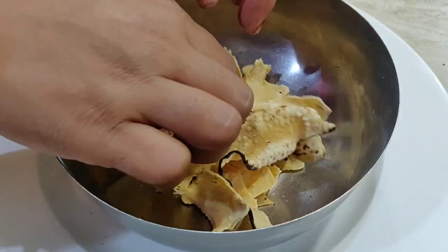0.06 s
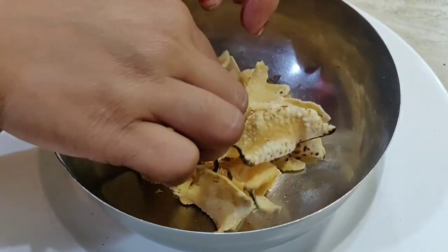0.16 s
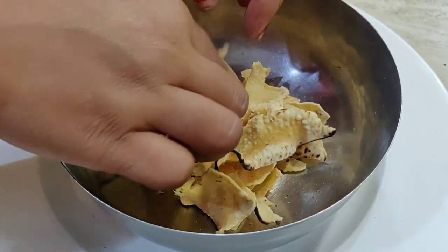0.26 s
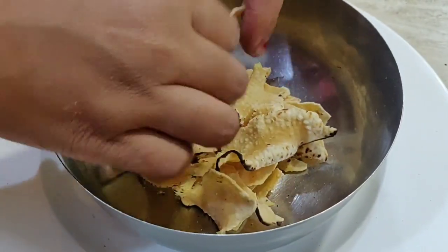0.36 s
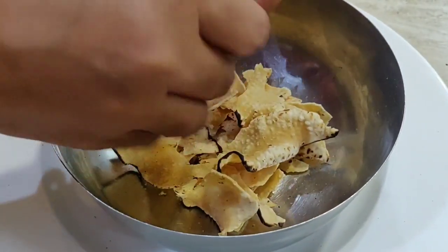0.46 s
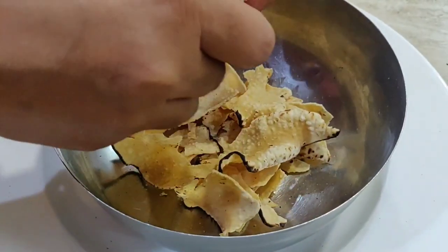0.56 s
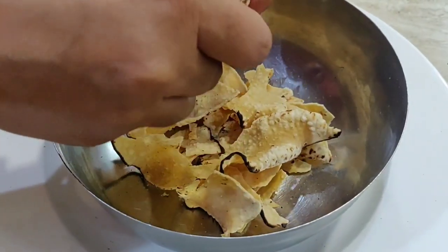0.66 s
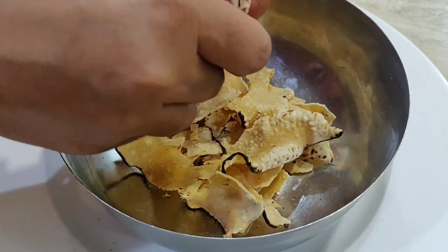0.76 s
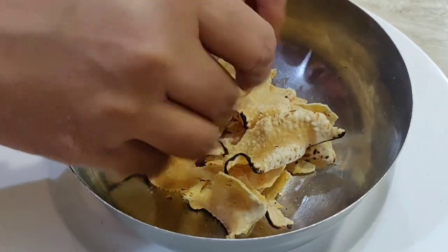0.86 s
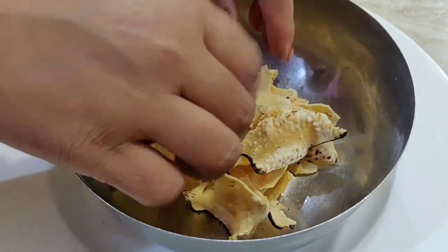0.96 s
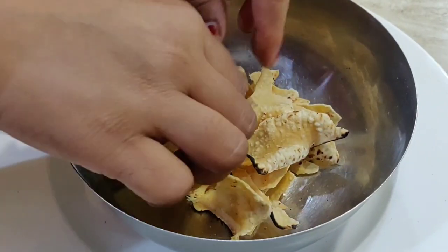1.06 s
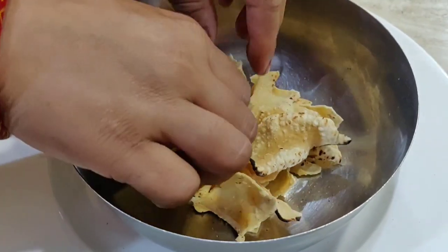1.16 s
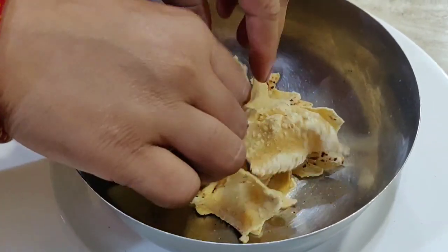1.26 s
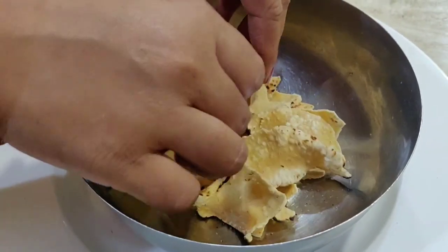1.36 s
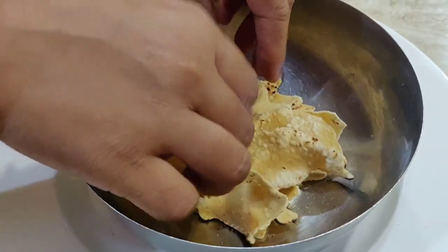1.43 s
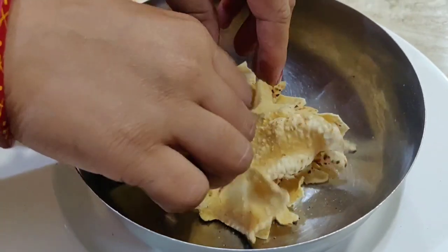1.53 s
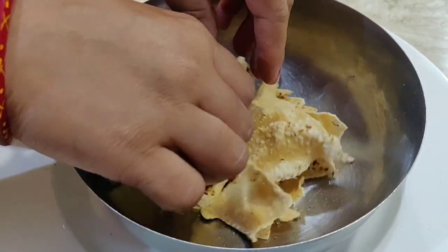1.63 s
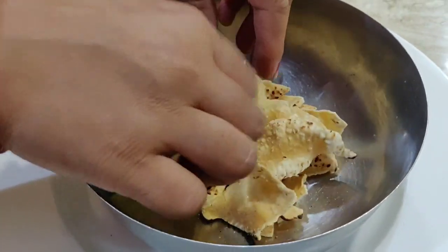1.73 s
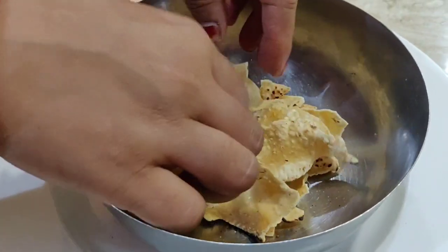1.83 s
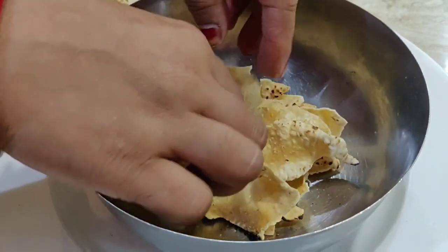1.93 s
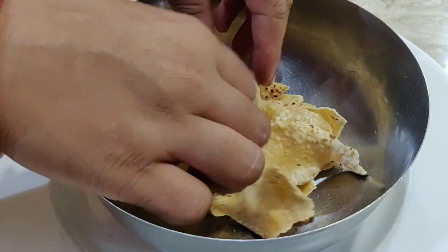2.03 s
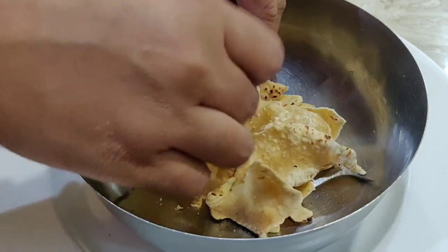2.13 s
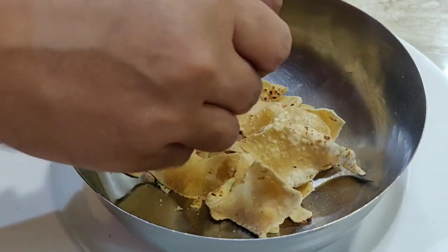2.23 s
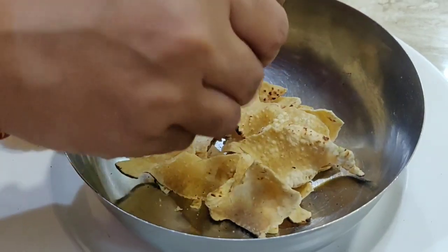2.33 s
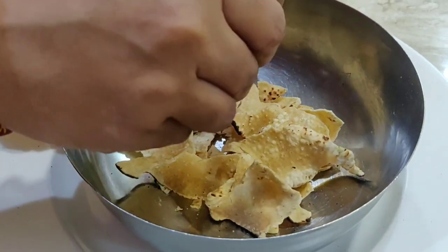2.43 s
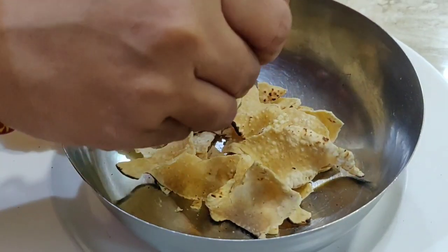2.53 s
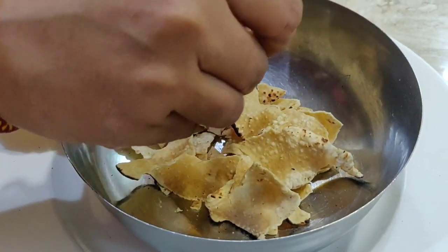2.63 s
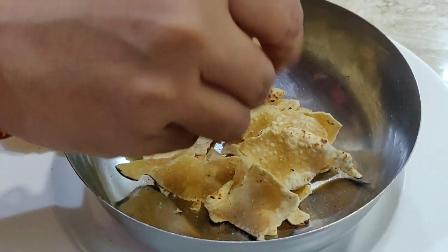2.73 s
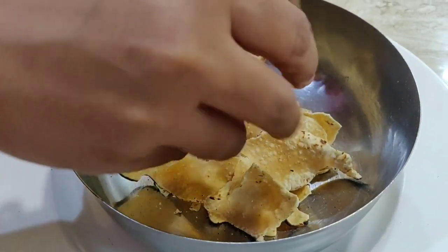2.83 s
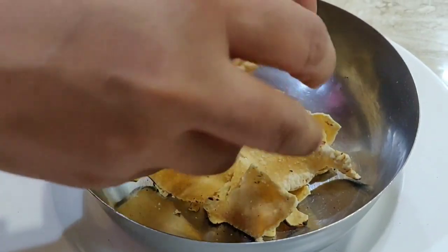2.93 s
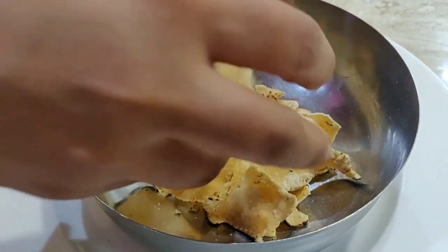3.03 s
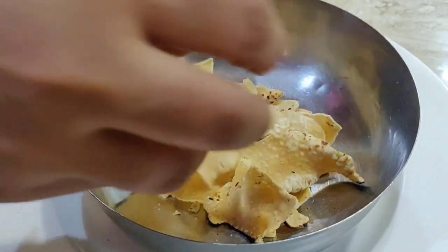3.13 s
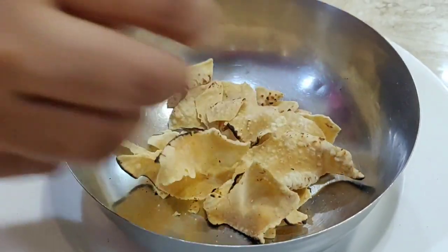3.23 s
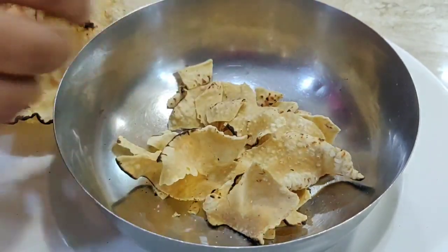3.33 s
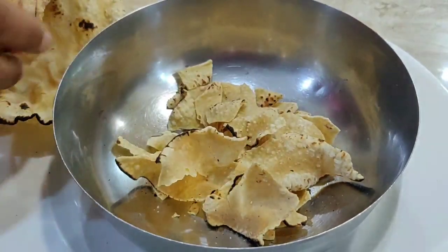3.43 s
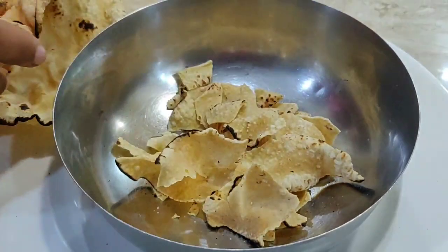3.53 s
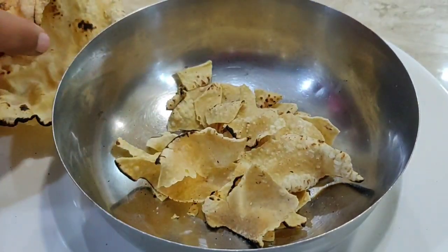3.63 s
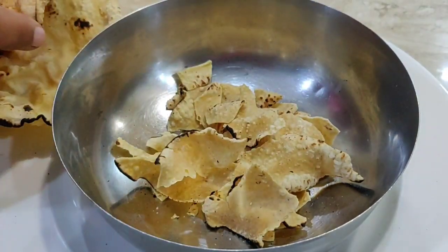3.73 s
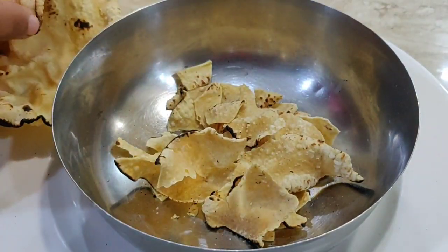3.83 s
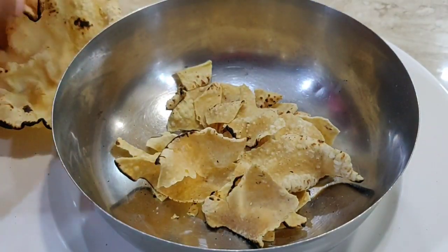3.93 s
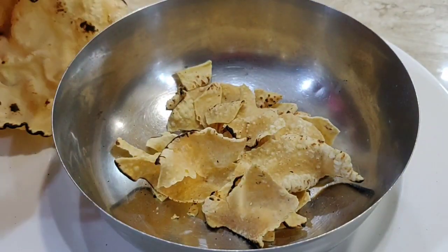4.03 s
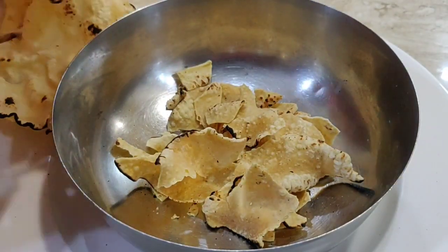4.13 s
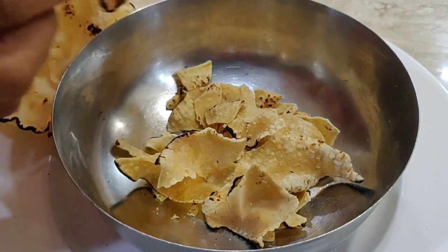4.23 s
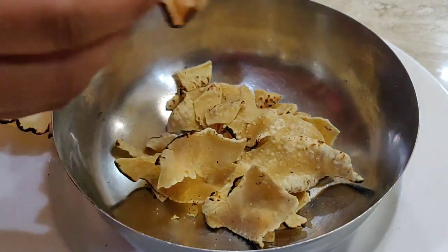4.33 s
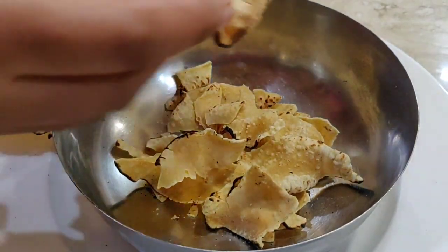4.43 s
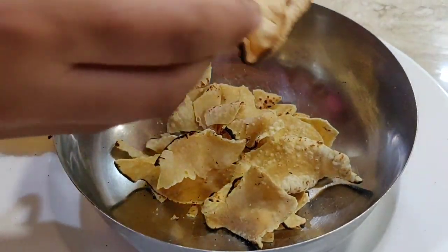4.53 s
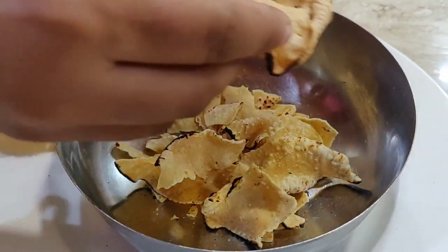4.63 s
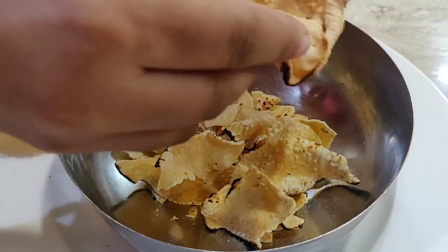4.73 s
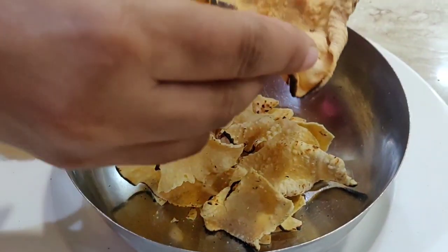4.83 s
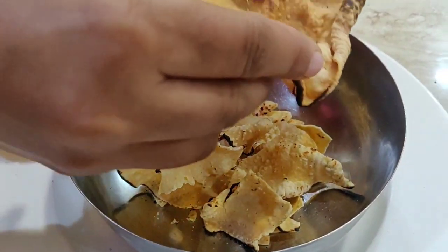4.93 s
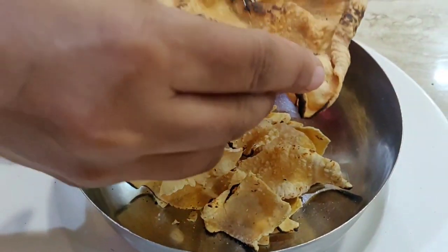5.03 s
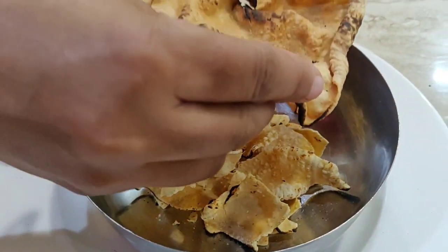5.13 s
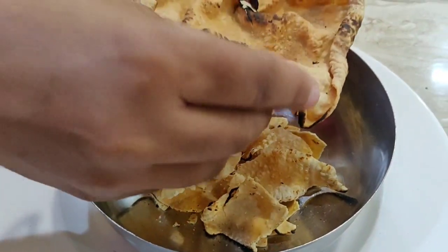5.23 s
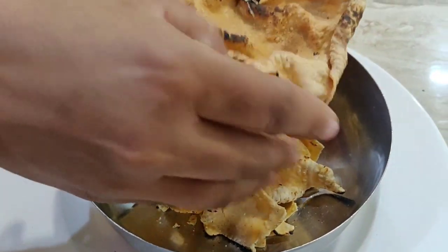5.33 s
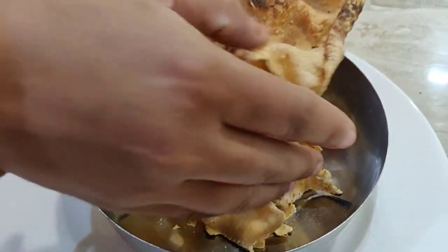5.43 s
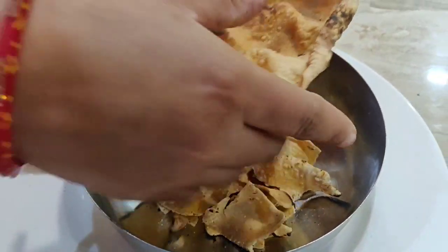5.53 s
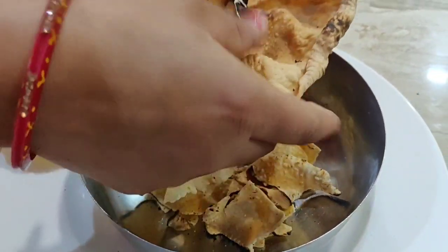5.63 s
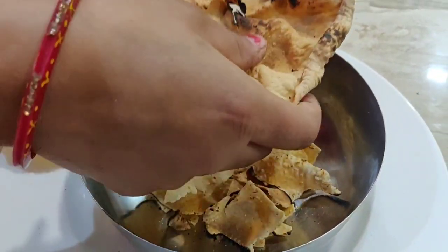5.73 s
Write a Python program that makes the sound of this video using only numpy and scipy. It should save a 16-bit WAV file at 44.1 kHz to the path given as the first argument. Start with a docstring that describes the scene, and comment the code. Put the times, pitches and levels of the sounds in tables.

```python
"""Over a low appliance rumble and hum, fingers break brittle roasted wafers into a steel bowl in a kitchen.
From the start, grips crush and rub shards: grains crackle over a sliding hiss. Between and over them come
snaps, each a short bright noise burst through shard resonances with a duller knock, answered by the walls.
Faint sine tones sound outside from about two seconds and again past five; near four seconds a whole wafer
is picked up and knocks hollowly, and the breaking then returns. A close two-port microphone hears it all."""
import sys
import numpy as np
from scipy import signal
from scipy.fft import rfft, irfft, next_fast_len
from scipy.io import wavfile
from scipy.ndimage import uniform_filter1d, map_coordinates

SR = 44100
rng = np.random.default_rng(int(sys.argv[2]) if len(sys.argv) > 2 else 0)


def generate_wav(signal):
    """Clip the signal to [-1, 1] and save it as 16-bit WAV at the path in sys.argv[1]."""
    frames = np.transpose(np.atleast_2d(signal))
    scaled = np.clip(frames, -1, 1) * 32767
    pcm = np.round(scaled).astype(np.int16)
    wavfile.write(sys.argv[1], SR, pcm)


N = 254376

# colour of splintering and sliding shards: pitch_hz, gain_db
SPLINTER = [(1500, -36.5), (2600, -17.5), (4000, -3.5), (5500, -6), (7000, -7), (9000, 2.5), (12000, 10),
            (16000, -8)]
# bending modes of small pieces: pitch_hz, width_hz, gain_db (before the layer's level)
WAFER_MODES = [(537, 690, -7), (994, 132, 6.5), (1362, 83, 5), (1648, 230, 2), (2680, 810, 5.5),
               (3400, 6300, -1)]
# a whole wafer flexes at other pitches: pitch_hz, width_hz, gain_db (before the layer's level)
WHOLE_MODES = [(430, 390, -1.5), (1445, 220, -2), (2070, 880, -8)]
# grips that crush and rub shards: start_s, hold_s, fizz_db, small_pieces_db, whole_wafer_db, left_right_tilt_db
GRIPS = [(0.0, 0.23, -42, -57.5, -63, 0.5), (0.308, 0.11, -54.5, -80, -70, 3),
         (0.565, 0.23, -50.5, -66.5, -70, -2), (0.964, 0.11, -49, -68, -76, 8),
         (1.094, 0.11, -37.5, -51.5, -80, -1.5), (1.225, 0.075, -37.5, -48.5, -71, 0.5),
         (1.449, 0.13, -34.5, -48, -72, 2.5), (1.607, 0.125, -36, -60, -77, 3),
         (1.782, 0.06, -42, -55, -74, 7), (1.85, 0.15, -38, -55, -74, -1.5),
         (2.036, 0.1, -45.5, -65, -61, 6), (2.579, 0.38, -54.5, -69, -69, 0),
         (2.847, 0.13, -55, -63.5, -79, -4), (3.104, 0.064, -44.5, -63, -57, 2),
         (3.602, 0.04, -60, -75, -61, 6), (3.702, 0.056, -49.5, -65, -57, 3),
         (3.771, 0.1, -49.5, -55.5, -54, 2.5), (3.913, 0.05, -55, -58.5, -52.5, 9),
         (4.03, 0.17, -56, -50.5, -51.5, 9), (4.202, 0.18, -41.5, -55.5, -61, 1.5),
         (4.412, 0.15, -52, -70, -61.5, 3.5), (4.625, 0.22, -53.5, -58, -61.5, -2),
         (4.93, 0.11, -35.5, -54.5, -77, -2), (5.074, 0.24, -39.5, -51.5, -78, 1.5),
         (5.428, 0.034, -45, -63.5, -60.5, -2), (5.602, 0.052, -52.5, -64, -60.5, -4)]


def amp(db):
    """Decibels to a gain factor."""
    return 10 ** (np.asarray(db) / 20)


def unit(x):
    """Scale to an RMS of one along the last axis."""
    return x / np.sqrt(np.mean(x ** 2, axis=-1, keepdims=True) + 1e-20)


def along(points, hz):
    """Interpolate (Hz, value) points on a log frequency axis."""
    f, v = np.transpose(points)
    return np.interp(np.log(hz + 1), np.log(f + 1), v)


def filtered(x, response):
    """Multiply the spectrum of x by a response of frequency, which may be complex."""
    m = next_fast_len(x.shape[-1] * 9 // 8 + 1024)
    spectrum = rfft(x, m) * response(np.fft.rfftfreq(m, 1 / SR))
    return irfft(spectrum, m)[..., :x.shape[-1]]


def causal(points):
    """The minimum-phase response with the gain of (Hz, dB) points."""
    def response(hz):
        cepstrum = irfft(np.log(amp(along(points, hz))))
        half = len(cepstrum) // 2
        cepstrum[1:half] *= 2  # fold onto positive time
        cepstrum[half + 1:] = 0
        return np.exp(rfft(cepstrum))
    return response


def peak(f, hz, width_hz):
    """One damped resonance, with unit gain at its centre."""
    return 1j * f * width_hz / (hz * hz - f * f + 1j * f * width_hz + 1e-9)


def resonances(modes):
    """The bending resonances of a hand-held piece, summed with alternating sign."""
    return lambda f: sum((-1) ** k * amp(db) * peak(f, hz, width)
                         for k, (hz, width, db) in enumerate(modes))


def wobble(rate):
    """A smooth random curve with a given number of knots a second."""
    knots = rng.standard_normal(int(N * rate / SR) + 4)
    return map_coordinates(knots, [np.arange(N) * rate / SR])


def patchy(x, depth_db):
    """Random patches of gain in time and frequency: the touching edges keep changing."""
    z = signal.stft(x, nperseg=256)[2]
    field = uniform_filter1d(rng.standard_normal(z.shape[-2:]), size=5, axis=0)
    field = uniform_filter1d(field, size=9, axis=1)
    return signal.istft(z * amp(depth_db * field / field.std()), nperseg=256)[1][..., :N]


def placed(s, rows):
    """Sum rows of short sounds at their start times in seconds."""
    at = np.round(s * SR).astype(int)[:, None] + np.arange(rows.shape[1])
    return np.bincount(at.ravel(), rows.ravel(), N + SR)[:N]


def rumble():
    """Steady room noise: the ports agree in the bass, oppose near 1650 Hz and partly agree at the top."""
    # colour of the room noise: pitch_hz, density_db (relative, per Hz)
    rumble_colour = [(15, -11), (25, 0.5), (151, -9.5), (193, -14.5), (340, -16), (446, -26), (504, -21.5),
                     (614, -32), (678, -24), (786, -27.5), (2760, -34.5), (3050, -31), (3440, -36.5),
                     (9000, -34.5), (11700, -40), (19800, -120)]
    # left-right correlation: pitch_hz, likeness (-1 to 1)
    likeness = [(60, 0.88), (180, 0.87), (550, 0.49), (1650, -0.95), (4970, 0.083), (15000, 0.47)]

    def mid_side(hz):
        turn = np.arccos(np.clip(along(likeness, hz), -1, 1)) / 2
        return amp(along(rumble_colour, hz)) * [np.cos(turn), np.sin(turn)]

    mid, side = filtered(rng.standard_normal((2, N)), mid_side)
    return amp(-50) * unit(np.array([mid + side, mid - side]))


def hum():
    """Narrow bands of low noise, the same at both ports, whose strengths drift and now and then swell."""
    # hum bands: pitch_hz, width_hz (of each of two filter passes), level_db (before swells and drift)
    hum_bands = [(44.7, 11, -58), (85, 18.5, -58.5), (165.4, 28, -61.5)]
    # swells, one list per band: centre_s, length_s, rise_db
    hum_swells = [
        [(1.25, 0.2, 6.5), (4.8, 0.18, 6)],
        [(0.4, 0.35, 3.5), (3.15, 0.2, 9.5)],
        [(2.0, 0.29, 6), (3.4, 0.2, 3.5)],
    ]
    t = np.arange(N) / SR
    total = 0
    for (hz, width, db), swells in zip(hum_bands, hum_swells):
        band = unit(filtered(rng.standard_normal(N), lambda f: peak(f, hz, width) ** 2))
        swell_db = sum(rise_db * np.exp(-((t - s) / length) ** 2) for s, length, rise_db in swells)
        drift_db = 1 * wobble(2.515)
        total = total + band * amp(db + swell_db + drift_db)
    return total


def grains(count, low_hz, high_hz, cycles, spread_db, clump_db):
    """Tiny shards, each ringing a few cycles at its own pitch; neighbours in time are alike in size."""
    at, pitch, size, left, right = rng.random((count, 5)).T
    s = at * N / SR
    clump = map_coordinates(rng.standard_normal(N * 70 // SR + 4), [s * 70])  # 70 knots a second
    turns = (low_hz * (high_hz / low_hz) ** pitch)[:, None] * np.arange(200) / SR
    size_db = -spread_db * np.log(size + .003) + clump_db * clump
    decay = amp(size_db)[:, None] * np.exp(-turns / cycles)
    ports = [placed(s, decay * np.sin(2 * np.pi * (turns + phase[:, None]))) for phase in (left, right)]
    return unit(np.array(ports))


def pressure(db):
    """The gain of a layer under all grips: each sets in fast, holds and lets go; powers add."""
    attack_s, let_go_db_per_s = 0.006, 150
    start, hold = np.transpose(GRIPS)[:2, :, None]
    t = np.arange(0, N + 64, 64) / SR - start  # one step every 64 samples
    attack = np.clip(1 + t / attack_s, 0, 1)  # full by the start time
    shape = attack * amp(-let_go_db_per_s * np.clip(t - hold, 0, None))
    return np.repeat(np.linalg.norm(amp(db)[:, None] * shape, axis=0), 64)[:N]


def rubbing():
    """Crackle of tiny breaks over the hiss of shards sliding; small and whole pieces sound along."""
    uneven_db, rest_db = 3.5, -64.5  # grip unevenness; small pieces keep settling at a constant level
    fizz_db, small_db, whole_db, tilt_db = np.transpose(GRIPS)[2:]

    def level(db):
        return pressure(db) * amp(uneven_db * wobble(18))

    hiss = unit(filtered(rng.standard_normal((2, N)), causal(SPLINTER)))
    crackle = grains(count=12000, low_hz=4600, high_hz=10400, cycles=1.05, spread_db=-0.5, clump_db=1.5)
    fizz = unit(patchy(crackle + 2.62 * hiss, depth_db=3.0))
    body = grains(count=4000, low_hz=408, high_hz=2850, cycles=1.9, spread_db=3.0, clump_db=4.5)
    body = body + 3.3 * rng.standard_normal((2, N))
    body = patchy(body + 0.15 * body[::-1], depth_db=3.0)  # long waves partly reach both ports alike
    small = unit(filtered(body, resonances(WAFER_MODES)))
    # a whole wafer rustles softly, without grains
    slide = rng.standard_normal((2, N)) + 2.1 * rng.standard_normal(N)
    whole = unit(filtered(patchy(slide, depth_db=0.0), resonances(WHOLE_MODES)))
    fizz_levels = [level(fizz_db - 0.5 + tilt_db / 2), level(fizz_db + 2.0 - tilt_db / 2)]
    return fizz * fizz_levels + small * (level(small_db) + amp(rest_db)) + whole * level(whole_db)


def crumbs():
    """Small chance breaks while a grip holds, stronger under a stronger grip."""
    count, over_fizz_db, spread_db = 130, 6.5, 4
    knock_db, t60_s, pan_db = -19, 0.021, 7  # knock re the break; middle decay; widest pan around the grip
    at, size, pitch, length, side = rng.random((count, 5)).T
    start, hold, fizz_db, _, _, tilt_db = np.transpose(GRIPS)
    held = np.cumsum(hold)
    k = np.searchsorted(held, at * held[-1])  # longer grips get more crumbs
    s = start[k] + held[k] - at * held[-1]
    db = fizz_db[k] + over_fizz_db - spread_db * np.log(size + 0.019)
    return np.transpose([s, db, np.full(count, knock_db), 5000 * 1.6 ** pitch,
                         t60_s * (.5 + length), tilt_db[k] + pan_db * (2 * side - 1)])


def bursts(rise, t60, size):
    """Rows of spiky noise that build up, then die away."""
    t = np.arange(size) / SR - rise[:, None]
    z = rng.standard_normal((len(t60), 2, size))
    lumps = amp(3.34 * unit(uniform_filter1d(z[:, 1], 24)))  # a crack runs in jerks
    envelope = np.where(t < 0, 1 + t / rise[:, None], amp(-60 * np.abs(t) / t60[:, None]))
    return z[:, 0] * lumps * envelope


def sized(rows, db, seconds):
    """Rows given the energy of a level held for some seconds."""
    gain = amp(db) * np.sqrt(seconds * SR)
    return rows / np.linalg.norm(rows, axis=1, keepdims=True) * gain[:, None]


def breaks(rows, knock_hz, body, body_db):
    """The splintering reaches each port by its own path; the short, duller knock is partly common to both."""
    s, db, knock_db, shard_hz, t60, pan_db = np.transpose(rows)
    t60 = np.clip(t60, .004, .08)
    rise = np.clip(0.0008 + 0.02 * t60, .0002, .02)  # seconds; longer breaks also build up longer
    extra_hz = 3800 * 2.68 ** rng.random((len(s), 3))  # every shard has a few more modes of its own
    # every knock weights the bending modes anew
    weights_db = 5 * rng.standard_normal((len(s), len(body), 1))
    bending = resonances([(hz, width, level + body_db + weights_db[:, k])
                          for k, (hz, width, level) in enumerate(body)])

    def bright(f):
        extra = sum(peak(f, hz[:, None], 370) for hz in extra_hz.T)
        modes = peak(f, shard_hz[:, None], 1600) + 0.12 * extra
        return causal(SPLINTER)(f) * (0.43 + modes)

    def dull(f):
        return bending(f) - peak(f, knock_hz[:, None], 330)

    short = np.minimum(0.97 * t60, .015)  # knock decay in seconds

    def push():
        return bursts(0.67 * rise, short, size=2000)

    common = push()

    def crack(side):
        splinters = filtered(bursts(rise, t60, size=2000), bright)
        return sized(splinters, db + side * pan_db / 2, 0.023 * (t60 + 4 * rise))

    def knock():
        thud = filtered(common + 0.66 * push(), dull)
        return sized(thud, db + knock_db, 0.026 * (short + 0.78 * rise + 0.0014))

    direct = [placed(s, crack(side) + knock()) for side in (1, -1)]
    # the walls hear each break from all sides: one plain click scaled by level and length
    clicks = placed(s + rise, (amp(db) * np.sqrt((t60 + 4 * rise) * SR / 60))[:, None])
    return np.array(direct), clicks


def kitchen(x, count=4):
    """Hard walls answer; moving hands keep changing the paths, so several noise tails take turns."""
    # decay of the room: pitch_hz, t60_s
    room_decay = [(500, 0.19), (3000, 0.45), (5000, 0.54), (8000, 0.81), (15000, 0.22)]
    hz, t, z = signal.stft(rng.standard_normal((count, 2, SR * 3 // 4)), SR, nperseg=256)
    tails = signal.istft(z * amp(-60 * t / along(room_decay, hz)[:, None]), SR, nperseg=256)[1]
    turn = np.arange(N) * 25 // SR % count  # 25 turns a second
    late = np.pad(x, ((0, 0), (480, 0)))[:, :N]  # about 11 ms of delay
    total = 0
    for k in range(count):
        tail = tails[k] / np.linalg.norm(tails[k, 0])
        total = total + signal.fftconvolve(late * (turn == k), tail, axes=1)[:, :N]
    return total


def snaps():
    """All breaks and knocks excite shard and bending modes; the kitchen answers them."""
    # fractures of small pieces: start_s, level_db, knock_db (re level), shard_hz, t60_s (clipped in breaks),
    # left_minus_right_db (of the splintering)
    fractures = [(0.0355, -20, -15, 5100, 0.03, 6), (0.123, -27, -27, 6600, 0.096, -3),
                 (0.1519, -25.5, -13.5, 6500, 0.072, 10), (0.176, -21, -26, 6350, 0.011, -12),
                 (0.222, -26.5, -28, 6340, 0.034, -2), (0.558, -3.5, -17.5, 6800, 0.013, -1.5),
                 (0.591, -21.5, -16.5, 6545, 0.026, 2), (0.7746, -27, -30, 8450, 0.12, 7),
                 (0.8845, -29, -2.5, 5700, 0.013, -6), (0.913, -16, -17, 6300, 0.02, 9),
                 (0.9218, -26.5, -14, 5800, 0.051, 16), (0.9413, -3, -28, 5360, 0.011, 0),
                 (0.958, -22, -14, 6670, 0.026, 7), (1.0341, -30, -22, 5380, 0.019, -11.5),
                 (1.067, -22, -40, 6290, 0.011, 0), (1.091, -22.5, -19, 6120, 0.044, -2),
                 (1.1451, -14.5, -36, 6470, 0.027, -7), (1.151, -6.5, -26.5, 6600, 0.013, -1),
                 (1.1916, -23, -7.5, 6103, 0.098, -3), (1.2196, -19, -22, 6900, 0.036, 3),
                 (1.325, -16, -31, 7400, 0.035, 2), (1.4435, -23.5, -23, 5310, 0.021, -1),
                 (1.473, -17, -14, 5727, 0.055, -4), (1.4811, -7, -18, 8150, 0.028, -1),
                 (1.5226, -22, -19, 6200, 0.1, -1), (1.556, -16, -12.5, 6060, 0.034, 6),
                 (1.621, -23, -19, 6600, 0.039, 10), (1.7038, -14.5, -25, 7460, 0.028, 2),
                 (1.7251, -25, -31, 7400, 0.018, 15), (1.734, -17.5, -25, 5428, 0.016, 2),
                 (1.8262, -20, -11, 7350, 0.017, 5), (1.867, -18, -16, 5500, 0.074, -4.5),
                 (1.8905, -24, -19, 5970, 0.035, -1), (1.9759, -12.5, -17.5, 6400, 0.021, 0),
                 (1.996, -18, -34, 6460, 0.015, 1), (2.0172, -15, -26, 6540, 0.014, 12),
                 (2.0212, -18, -20, 6240, 0.015, -4), (2.028, -16.5, -21, 5800, 0.039, 0),
                 (2.0587, -27, -19, 5400, 0.032, 8), (2.3249, -6, -23, 6680, 0.021, -8.5),
                 (2.3378, -1.5, -27, 6900, 0.018, 2), (2.4517, -6, -23, 9600, 0.017, -7),
                 (2.473, -1.5, -25.5, 7150, 0.02, 2.5), (2.6378, -34, -27, 9100, 0.029, -16),
                 (2.73, -29.5, -20, 6500, 0.019, 4), (2.79, -23.5, -9, 6330, 0.043, 9),
                 (2.799, -23.5, -11.5, 6400, 0.027, -9), (2.834, -8, -30, 8600, 0.012, -2.5),
                 (2.8529, -13.5, -19, 5300, 0.017, -1), (2.872, -10, -24, 5300, 0.0067, -6),
                 (2.885, -13.5, -17, 4750, 0.014, -15.5), (3.1087, -10.5, -22.5, 5300, 0.0098, 9),
                 (3.134, -28.5, -6, 6400, 0.055, 7), (3.182, -36.5, -6, 6300, 0.056, 14),
                 (4.213, -27, -19, 8950, 0.06, 7), (4.422, -20.5, -32, 4250, 0.052, 4),
                 (4.484, -27, -21, 7000, 0.024, 9), (4.664, -28.5, -5, 4600, 0.06, 4),
                 (4.703, -25, -5, 5430, 0.029, 4), (4.745, -18, -14, 5530, 0.067, 0.5),
                 (4.753, -16.5, -5, 5460, 0.021, -8), (4.8164, -6, -16.5, 5660, 0.01, 4.5),
                 (4.848, -15.5, -36, 6300, 0.019, -1), (4.9001, -1, -23, 6100, 0.012, -11),
                 (4.9076, 7, -24, 6330, 0.017, 2), (4.92, -3, -17.5, 6600, 0.056, -1),
                 (4.9264, -9, -30, 6400, 0.02, 5), (4.939, -12.5, -5.5, 5520, 0.019, -14),
                 (4.9633, -0.5, -23.5, 6940, 0.0095, -6), (5.0277, -11.5, -18, 6400, 0.073, -3),
                 (5.0367, -2.5, -19, 6800, 0.012, 0), (5.0552, -27, 6, 5900, 0.17, 3),
                 (5.1215, -1.5, -22, 5880, 0.0091, -5.5), (5.14, -15.5, -6, 4860, 0.065, 0),
                 (5.1552, -23, -12, 5410, 0.11, -12), (5.165, -16.5, -11, 4430, 0.087, 4),
                 (5.178, -18, -6.5, 6860, 0.089, -1), (5.19, -22, -11, 5560, 0.024, -12),
                 (5.198, -21.5, -7, 7130, 0.031, -4), (5.2096, -23.5, -2.5, 5860, 0.05, -8),
                 (5.28, -24, -7, 7400, 0.045, 1.5), (5.423, -19.5, -34, 5100, 0.025, -2),
                 (5.4826, -27, -26, 6800, 0.033, 4), (5.5, -25, -35, 7620, 0.015, 5),
                 (5.5445, -28, -20, 7000, 0.025, 1), (5.553, -31, -3, 5700, 0.065, -3.5),
                 (5.574, -28.5, -14, 7100, 0.037, 0), (5.6614, -34, -7, 4540, 0.084, -2)]
    # a whole wafer is picked up and knocks hollowly: start_s, level_db, knock_db (re level),
    # t60_s (clipped in breaks), knock_hz
    lifting = [(3.7567, -46, 15.5, 0.018, 1280), (3.828, -39, 4.5, 0.054, 1410),
               (3.852, -42, 11, 0.019, 1170), (3.898, -33, -8, 0.058, 1094), (3.925, -29.5, 2, 0.058, 1045),
               (4.0337, -23.5, 5, 0.012, 2200), (4.0505, -39, 6, 0.021, 2100),
               (4.085, -24, -6, 0.045, 1360), (4.102, -34, 4, 0.044, 2110), (4.118, -31.5, -3, 0.098, 2180)]
    # colour of the walls' answer: pitch_hz, gain_db
    answer_colour = [(300, -41), (1000, -22), (2500, -24.5), (4000, -21.5), (5500, -15.5), (7000, -17),
                     (9000, -11), (14000, -6)]
    small = np.vstack([fractures, crumbs()])
    small_hz = 1000 * np.exp(0.17 * rng.standard_normal(len(small)))  # small pieces knock near one pitch
    lifted_shard_hz, lifted_pan_db = 5300, 2.5
    lifted = [(s, db, knock_db, lifted_shard_hz, t60, lifted_pan_db) for s, db, knock_db, t60, _ in lifting]
    small_direct, small_clicks = breaks(small, small_hz, WAFER_MODES, body_db=-3.5)
    whole_direct, whole_clicks = breaks(lifted, np.transpose(lifting)[4], WHOLE_MODES, body_db=-8.5)
    clicks = filtered(small_clicks + whole_clicks, causal(answer_colour))
    return small_direct + whole_direct + patchy(kitchen(clicks[None]), depth_db=4.1)


def tones():
    """Each sine tone swells, wavers in level and fades, 8 dB stronger on the right."""
    # faint steady tones from outside, like far traffic horns:
    # start_s, end_s, level_db (sine peak on the right, before wavering), pitch_hz
    far_tones = [(2.06, 2.42, -61, 2326), (2.15, 2.36, -70, 3725), (5.4, 5.63, -64, 1190),
                 (5.61, 5.76, -66, 1262), (5.5, 5.74, -67, 2003)]
    t = np.arange(N) / SR
    total = 0
    for start, end, db, hz in far_tones:
        arch = np.sin(np.pi * np.clip((t - start) / (end - start), 0, 1))
        swell = np.sqrt(np.clip(arch, 0, 1))
        waver = amp(1.5 * wobble(25))
        total = total + amp(db) * swell * waver * np.sin(2 * np.pi * hz * t)
    return amp([[-8], [0]]) * total


def scene():
    """The breaking, rubbing, outside tones and room noise summed on the two sides."""
    return snaps() + rubbing() + tones() + rumble() + hum()


def record(dry):
    """The left is dull above about 8 kHz, the right stays brighter; high peaks are rounded, faint hiss added."""
    # treble colour of each side: pitch_hz, gain_db
    left_colour = [(60, -2), (700, 0), (3000, -3.5), (6300, 4), (7500, 2.5), (8100, -18), (8700, -11),
                   (9600, -65), (11000, -61), (13500, -35), (15200, -31), (16000, -40)]
    right_colour = [(60, -4.5), (700, 0.5), (3000, -0.5), (6300, 6), (8800, 1.5), (9600, -7), (10500, -27),
                    (13500, -21), (15300, -12), (16000, -39)]
    sides = filtered(dry, lambda hz: np.array([causal(left_colour)(hz), causal(right_colour)(hz)]))
    hiss = amp(-69.0) * filtered(rng.standard_normal(dry.shape), lambda hz: hz < 15500)
    rounded = sides / (1 + np.abs(sides / .8) ** 6) ** (1 / 6)  # peaks stay under 0.8
    return filtered(rounded + hiss, lambda hz: hz < 16600)


dry = scene()
out = record(dry)
generate_wav(out)
```